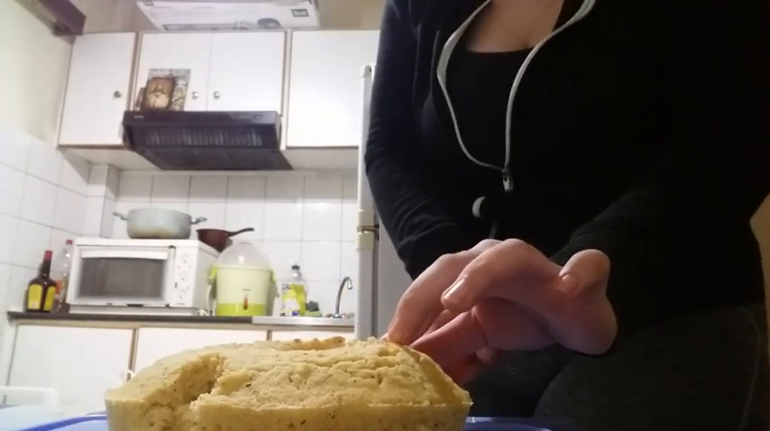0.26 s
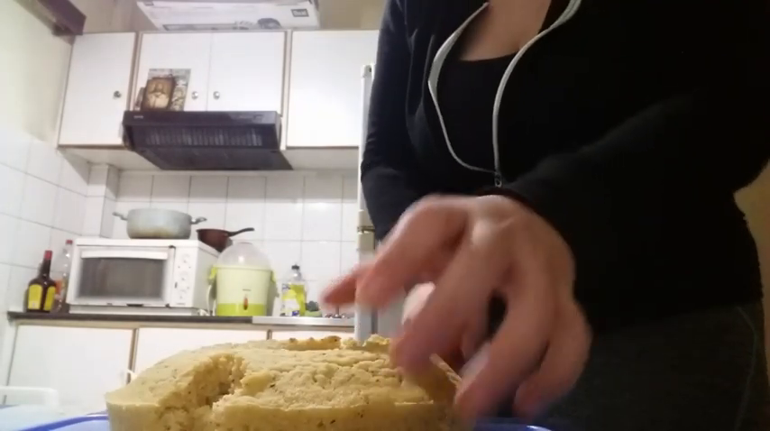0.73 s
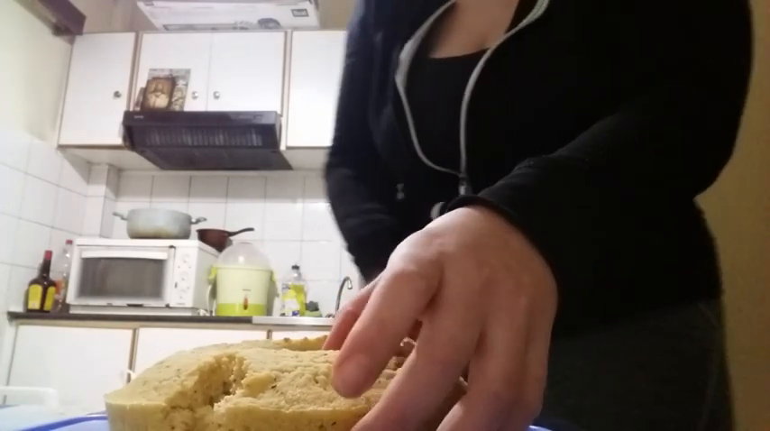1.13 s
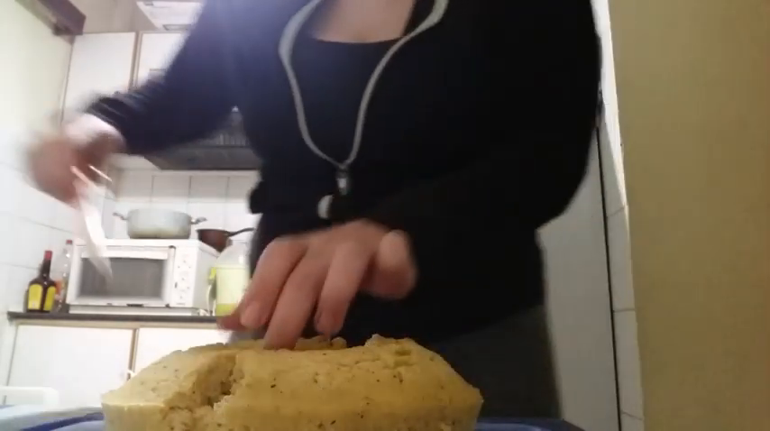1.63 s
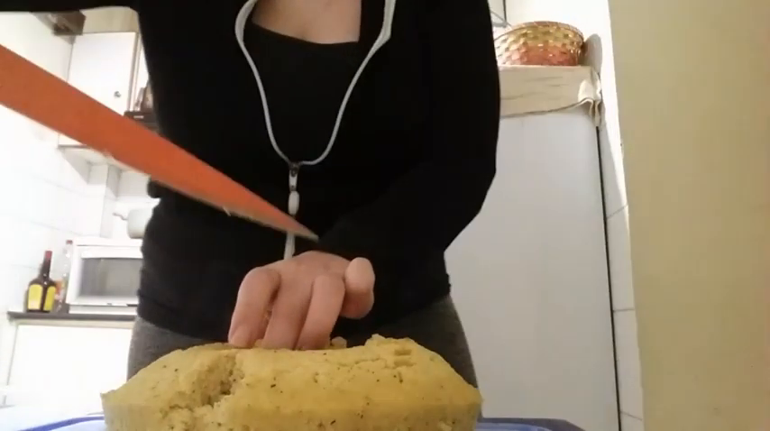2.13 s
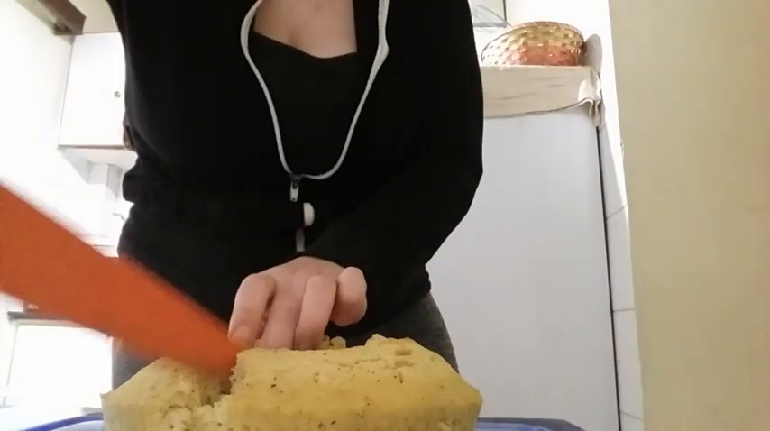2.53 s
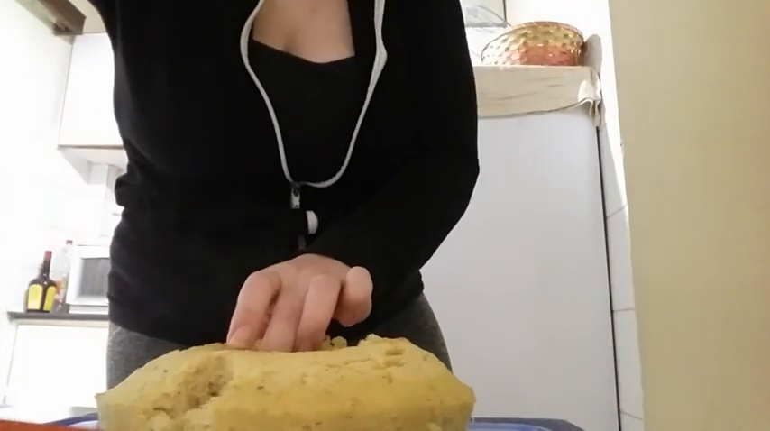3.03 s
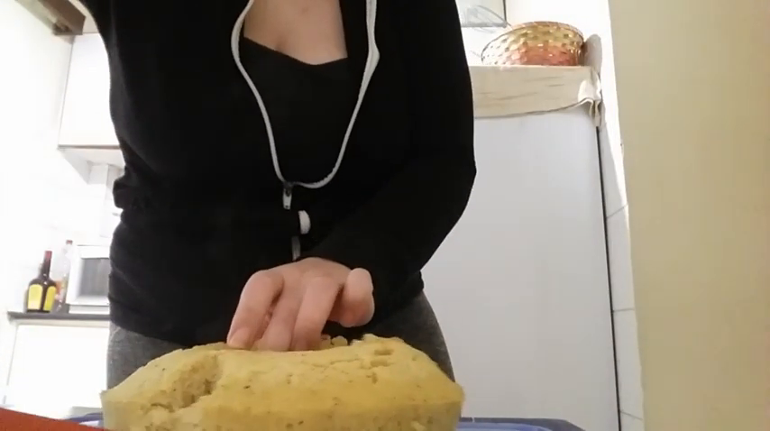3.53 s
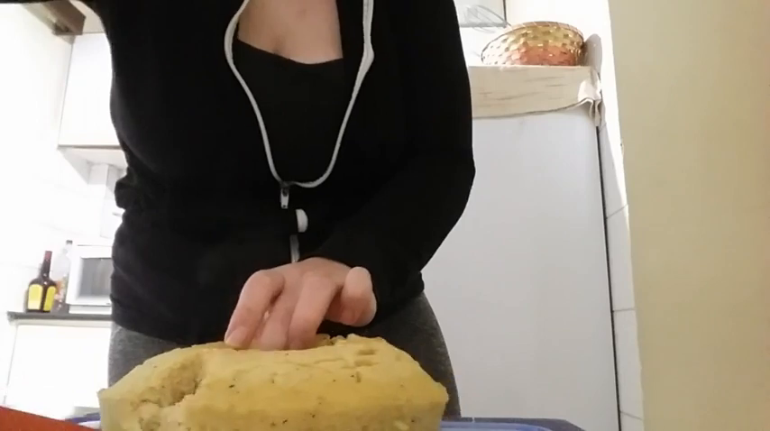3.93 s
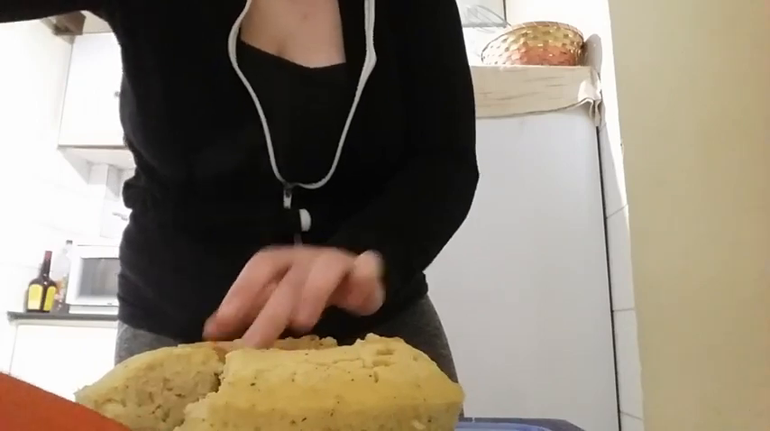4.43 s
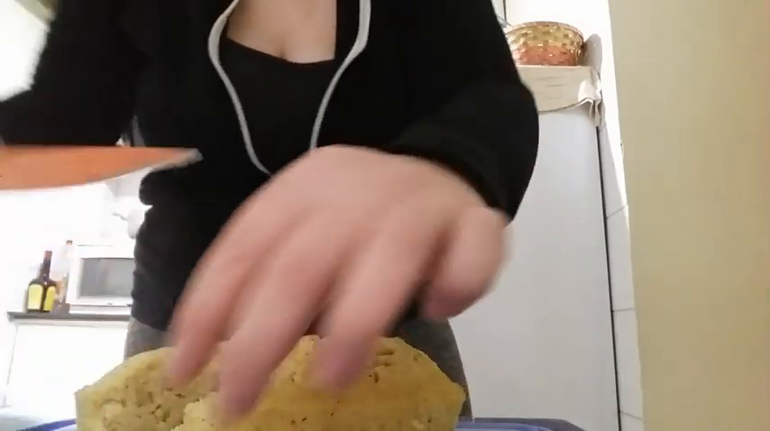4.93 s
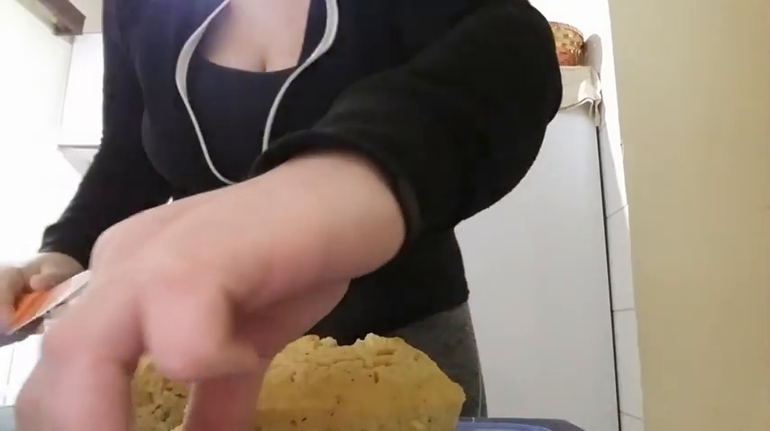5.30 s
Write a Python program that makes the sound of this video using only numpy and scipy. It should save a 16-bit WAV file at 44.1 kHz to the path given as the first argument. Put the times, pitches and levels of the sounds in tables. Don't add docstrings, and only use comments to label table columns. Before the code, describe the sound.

Hands jostle a crumbly loaf on a plastic tray with low knocks and crust snaps, then a knife saws quietly through it.

```python
import sys
import numpy as np
from scipy import signal
from scipy.fft import rfft, irfft, next_fast_len
from scipy.io import wavfile

SR = 44100
rng = np.random.default_rng(int(sys.argv[2]) if len(sys.argv) > 2 else 0)


def volts_from_decibels(level):
    exponent = np.asarray(level, float) / 20
    return 10 ** exponent


def to_wav(sig):
    pcm = np.clip(np.atleast_2d(sig), -1, 1) * 32767
    pcm = np.round(pcm).astype(np.int16)
    wavfile.write(sys.argv[1], SR, pcm.T)


N = 245195

# (f/Hz, level/dB per Hz)
HUM_AND_HISS = [(22, -23), (45, -25), (75, -25), (120, 8.5), (165, -12.5), (280, -14.5), (500, -17.5),
                (1000, -17), (2300, -22.5), (3300, -32.5), (4600, -32.5), (6000, -35), (9000, -37),
                (16000, -38)]
# (f/Hz, likeness from -1 to 1)
LIKENESS = [(60, 1), (180, 0.75), (550, -0.72), (1650, -0.0073), (4970, -0.2), (15000, -0.023)]
# (start t/s, end t/s, f/Hz, level/dB, pitch waver/rad)
PEEPS = [
    (1.589, 1.752, 5100, -69, 0.6),
    (1.82, 1.86, 5060, -67, .5),
    (2.16, 2.25, 6300, -73, 1.9),
]
# (f/Hz, level/dB, fade by 60 dB/s)
HOLLOW_MODES = [(790, -4, 0.023), (1000, 4, 0.037), (1600, -6, .02), (2140, -9, .02)]

# (f/Hz, level/dB, fade by 60 dB/s)
TRAY_MODES = [(69, -13, 0.014), (132.3, -21.5, 0.043), (162, -2.5, 0.026), (245.7, 4, 0.079),
              (250.5, 1.5, 0.13), (295.4, 1, 0.039), (351.4, -2, 0.041), (435.4, -2, 0.047),
              (609, -5.5, 0.022), (676, -5.5, 0.013)]
# (f/Hz, level/dB, fade by 60 dB/s)
THUD_MODES = [(175.5, -20.5, 0.14), (233, -4.5, 0.036), (246, -19, 0.22), (312.5, -9.5, 0.035),
              (442, -11, 0.043), (578, -16.5, 0.05)]
# (f/Hz, level/dB, fade by 60 dB/s)
CRUST_MODES = [(800, 6.5, 0.012), (995, 6.5, 0.029), (1520, 7, 0.013), (1720, 7, 0.0088), (2230, 8, 0.0052)]
# (f/Hz, level/dB, fade by 60 dB/s)
EDGE_MODES = [(2730, -3, 0.019), (3480, 6.5, 0.0025), (4260, 7, 0.01), (4270, 9, 0.002), (5000, -5, 0.013),
              (6070, -7, 0.0098), (8500, 5.5, 0.0041), (13800, -4, 0.0027)]
# (f/Hz, level/dB, fade by 60 dB/s)
BLADE_MODES = [(2767, 0.5, 0.029), (5100, 8, 0.0083), (5400, -26, 0.025), (6300, -34, 0.0081),
               (10400, 0, 0.0033), (14400, 4, 0.0044)]

# (start t/s, hold/s, level/dB)
LEANS = [(0.0, 0.022, -51), (0.139, .04, -52.5), (0.218, 0.046, -48.5), (0.4, 0.068, -45),
         (0.53, 0.056, -51), (0.618, 0.049, -51), (0.752, 0.059, -52), (0.96, 0.022, -51.5),
         (1.106, 0.065, -52.5), (1.256, 0.026, -59), (2.626, 0.098, -53.5), (2.85, 0.01, -53),
         (2.885, .08, -59), (3.143, 0.12, -49.5), (3.358, 0.029, -49), (3.498, 0.12, -53),
         (3.71, 0.046, -60), (3.8, 0.15, -58.5), (4.06, 0.12, -53.5), (4.244, 0.071, -60.5),
         (4.497, 0.045, -60), (4.906, 0.15, -66.5), (5.349, 0.024, -51.5), (5.506, 0.053, -57)]
# (t/s, lift/dB)
COUNTER_LIFT = [(0, -2.5), (0.7, -3.5), (1.3, 3.5), (2.6, 7.5), (2.95, 4), (3.15, 2.5), (3.6, -4),
                (4.3, -3.5), (4.6, 8), (5.3, -6), (5.56, 0)]
# (t/s, lift/dB)
HAND_PRESS = [(0.0, -8.5), (0.25, -3.5), (0.5, 2), (0.65, 4.5), (0.8, -0.5), (0.83, 8.5), (0.95, -6.5),
              (1.04, 16), (1.1, 10), (1.19, 12), (1.26, -6), (1.3, 3), (2.6, 3), (3.5, -4), (3.95, -0.5),
              (4.12, 9.5), (4.26, 4), (4.34, 15), (4.45, -9), (4.9, 1), (5.56, -7.5)]
# (t/s, samples by which the right port hears later)
SIDE_LAG = [(0, 6), (0.2, 0), (0.5, 3), (0.6, -7), (0.65, -6), (0.675, 4), (0.8, 1), (1.1, 10), (1.2, 10),
            (1.3, 1), (2.8, -4), (3.2, -2), (4.5, -1), (5.56, 0)]

# (start t/s, hold/s, drag level/dB, tearing above drag/dB, crackle above tearing/dB)
BRUSHES = [
    (1.32, 0.016, -66.5, -0.5, -0.5),
    (1.66, 0.12, -66.5, -4, -7.5),
    (1.85, 0.3, -70.5, -4.5, 4.5),
    (2.3, 0.036, -68, -15, 4),
    (3.0, 0.09, -70.5, -7, 2.5),
    (4.63, .02, -67.5, -7, -9),
    (4.88, 0.046, -78.5, 12, -25),
    (5.07, 0.027, -71, -12, -15),
    (5.26, 0.013, -66, -10, -13),
]
# (start t/s, hold/s, drag level/dB, tearing above drag/dB, crackle above tearing/dB)
SHIFTS = [(0.0, 0.045, -62.5, -4, -4), (0.09, 0.074, -71, -7, 1), (0.17, 0.0091, -55, -8, -5),
          (0.218, 0.035, -48, -7.5, -10), (0.34, 0.026, -46, -16.5, -5.5), (0.47, .02, -55.5, -9, -7),
          (0.515, 0.039, -39.5, -10.5, -9.5), (0.635, 0.046, -37.5, -9.5, 0), (0.67, 0.015, -32.5, -7, -8),
          (0.74, 0.042, -59.5, 4.5, -3.5), (0.8, 0.045, -45.5, -13.5, -8), (0.86, 0.12, -52.5, -12.5, 0),
          (1.0, 0.051, -47.5, -11.5, -2.5), (1.11, 0.016, -47.5, -8, -3.5), (1.15, 0.056, -40.5, -9, -3),
          (1.225, 0.058, -47.5, -9.5, 0), (5.0, 0.036, -63, -32, 5), (5.34, 0.016, -69, -3.5, -5),
          (5.43, 0.11, -68, 2, -6.5)]
# (start t/s, hold/s, drag level/dB, tearing above drag/dB, crackle above tearing/dB)
STROKES = [(2.61, 0.01, -61.5, -4.5, -3.5), (2.67, 0.018, -64.5, -3.5, 2), (2.84, 0.075, -66, 2.5, -2),
           (3.13, 0.1, -59.5, 5, -13), (3.26, 0.044, -54, -6.5, -2), (3.37, 0.039, -59.5, 1.5, -8.5),
           (3.49, 0.069, -58, 2, -5.5), (3.64, 0.039, -60.5, 2.5, -6.5), (3.74, 0.025, -65, 5, -6.5),
           (3.785, 0.058, -48.5, -4.5, -7), (3.9, 0.12, -48, -8.5, -4), (4.085, 0.12, -48, -8, -1.5),
           (4.205, 0.02, -49.5, -12, -5), (4.29, 0.081, -51, -15, -2), (4.38, 0.036, -56.5, -9, -1),
           (4.45, 0.064, -61.5, -15, 2), (4.53, 0.029, -46.5, -11, 0)]

# (t/s, peak level/dB, f/Hz, left over right/dB)
BUMPS = [(0.5096, -37, 385, 3), (0.527, -31, 328, 3), (0.5535, -34, 300, 0), (0.6424, -16, 310, 0),
         (0.6559, -22, 330, 1), (0.679, -21, 426, 1), (0.6985, -27.5, 396, 1), (0.7075, -30, 380, 1),
         (0.7115, -28, 450, 1), (0.813, -39, 240, -1), (0.825, -39, 450, 1), (0.905, -39, 310, 2),
         (0.946, -41, 250, 1), (1.022, -38, 453, 1), (1.048, -39, 460, 1), (1.153, -27, 465, 2),
         (1.185, -38, 450, 0), (1.222, -36, 310, 0), (1.26, -38, 230, 0), (2.628, -46, 110, 0),
         (2.848, -32.5, 135, 0), (3.2098, -38, 332, 0), (3.293, -43, 420, 3), (3.4842, -43, 344, 0),
         (3.729, -46, 260, -2), (4.085, -46, 400, 0), (4.329, -45, 480, 0)]
# (t/s, peak level/dB, f/Hz, left over right/dB)
CRUST_TICKS = [(0.0329, -50, 3900, 8.5), (0.2152, -31, 1840, 2), (0.4815, -52, 800, 5),
               (0.522, -48, 1300, 7), (0.5517, -47, 1500, -4), (0.6078, -39, 2800, 5),
               (0.612, -52, 4000, 2), (0.632, -23, 2600, 11), (0.6417, -18.5, 3000, 14),
               (0.6463, -25, 4000, -12), (0.654, -26.5, 2700, 7), (0.6593, -38, 4000, -2),
               (0.6744, -42, 2230, 0), (0.7741, -53, 2200, -1), (1.1105, -37, 2400, 11),
               (1.1476, -27, 2700, 18.5), (1.1528, -32, 1520, -12), (1.2981, -42, 950, 2),
               (2.8143, -43, 855, 1), (2.842, -27.5, 2400, -4), (2.8421, -36, 910, 1),
               (2.9446, -42.5, 1400, -2), (3.0925, -52, 3000, -1), (3.1183, -44, 2280, -3),
               (3.1569, -33.5, 1490, -7), (3.1825, -53, 1500, -2), (3.191, -42, 1400, -7),
               (3.2085, -44, 1700, -5), (3.2963, -40, 1750, -1), (3.3017, -28, 1690, 0),
               (3.3053, -32, 1500, -4), (3.3715, -42, 1900, -6), (3.4107, -47, 1650, -3),
               (3.5036, -34, 1900, -5), (3.6582, -50, 1700, 0), (3.7395, -56, 1900, -2),
               (4.0565, -44, 3170, -5), (4.139, -36, 2480, -9), (4.2188, -37, 2200, -4),
               (4.26, -51, 3500, -4), (4.5287, -46, 2600, -8), (5.3395, -51, 900, 8),
               (5.52, -46.5, 1530, 2.5)]
# (t/s, snap peak level/dB, thud level/dB, bright edge level/dB, left over right/dB)
HAND_KNOCKS = [(0.035, -54, -54, -52, 12), (0.215, -29.5, -14, -58.5, 4), (0.477, -72.5, -35.5, -92.5, 6),
               (0.51, -55, -50, -59, 17), (0.554, -49, -32, -72, 7), (0.607, -48, -37, -48, 3),
               (0.618, -59, -26, -65, -4), (0.631, -31.5, -27, -34, -15), (0.6407, -30, -6, -27, 7.5),
               (0.654, -43, -26, -36, 0), (0.674, -28, -12, -27.5, 3), (0.695, -60, -34, -55, -2),
               (0.706, -46, -47, -47, 6), (0.808, -62, -45, -64, -6), (0.87, -57, -32, -71, 5),
               (0.976, -70, -50, -54, -9), (1.11, -37.5, -34, -43.5, 12), (1.145, -35, -29.5, -36.5, -29),
               (1.152, -24, -25, -32, 0), (1.3, -50, -45, -69, -1), (4.999, -58, -47, -76, -1),
               (5.34, -54.5, -28, -74, 0), (5.398, -54, -52, -74, -3), (5.517, -49, -43, -76, 5)]
# (t/s, snap peak level/dB, thud level/dB, bright edge level/dB, left over right/dB)
KNIFE_KNOCKS = [(2.615, -56.5, -48.5, -65, -2.5), (2.67, -52.5, -54, -58, -3), (2.811, -50, -37, -55, 3),
                (2.8418, -36.5, -43, -43, 0), (2.943, -53, -44, -56, -1.0), (3.131, -54, -40.5, -54.5, -9),
                (3.154, -41, -63, -57, -0.5), (3.195, -47.5, -42, -73, -5), (3.208, -45, -28.5, -66, 3),
                (3.2937, -37.5, -35.5, -52.5, 4), (3.301, -40, -63, -50, -3), (3.371, -38, -31, -65, 2),
                (3.482, -76, -37, -74, 6), (3.504, -48, -49, -50.5, 0), (3.542, -48, -37.5, -66, -4),
                (3.737, -45.5, -53, -74, -5), (4.056, -57, -50, -60, -5.5), (4.109, -64, -36, -62, 3),
                (4.138, -55, -57, -53, -7), (4.22, -47, -45, -57, -9), (4.247, -71, -35, -83, 9),
                (4.331, -78, -51, -77, 4), (4.417, -79, -44, -74, -7), (4.511, -71, -45, -76, 4)]
# (t/s, peak level/dB, left over right/dB, lowest mode level/dB)
BLADE_TOUCHES = [
    (2.664, -52, -2, -1),
    (2.6748, -44.5, -9.5, -1),
    (2.6818, -58, 9, 14.5),
    (2.6914, -61, -3.0, -2),
    (2.8413, -28, -13.5, -10),
    (2.9144, -55, -5, -11),
    (4.5544, -81, 5, -6),
]


def rms_one(x):
    return x / np.sqrt(np.mean(x ** 2) + 1e-20)


def follow(table, t):
    return np.interp(t, *np.transpose(table))


def at_hz(table, hz):
    f, value = np.transpose(table)
    return np.interp(np.log(hz), np.log(f), value)


def drift(rate_hz):
    r = np.exp(-80 * np.pi * rate_hz / SR)
    noise = rng.standard_normal(N // 40 + 2002)
    slow = signal.lfilter([1], [1, -2 * r, r * r], noise)[2000:]
    return np.interp(np.arange(N) / 40, np.arange(len(slow)), rms_one(slow))


def highpass(x, order, hz):
    return signal.sosfilt(signal.butter(order, hz, "high", fs=SR, output="sos"), x)


def soften(x, hz, order=2):
    return signal.sosfilt(signal.butter(order, hz, fs=SR, output="sos"), x)


def ring(clicks, hz, t60):
    r, w = volts_from_decibels(-60 / (t60 * SR)), 2 * np.pi * hz / SR
    return signal.lfilter([0, np.sin(w)], [1, -2 * r * np.cos(w), r * r], clicks + 1e-18)


def place(at, sizes, pan_db, lag):
    out = np.zeros((2, N))
    right_at = at + np.round(lag).astype(int)
    np.add.at(out[0], np.clip(at, 0, N - 1), sizes * volts_from_decibels(pan_db / 2))
    np.add.at(out[1], np.clip(right_at, 0, N - 1), sizes * volts_from_decibels(-pan_db / 2))
    return out


def grains(per_s, spread_db, clump_db, scatter):
    chance = per_s * volts_from_decibels(clump_db * drift(25)) / SR
    at = np.flatnonzero(rng.random(N) < chance)
    count = len(at)
    size = volts_from_decibels(spread_db * np.minimum(rng.exponential(1, count), 4)) * rng.choice([-1, 1], count)
    return at, size, 3.0 * rng.standard_normal(count), scatter * rng.standard_normal(count)


def strike(s, level_db, pan_db, lag, modes, cracks, luck_db, sign=-1):
    later = rng.random((len(s), cracks)) * 0.0052
    later[:, 0] = 0
    fade_db = 970 * later + 3.7 * (later > 0)
    at = ((s[:, None] + later + 0.001017) * SR).astype(int)
    luck, out = rng.standard_normal((len(s), cracks, len(modes))), 0
    for k, (hz, db, t60) in enumerate(modes):
        size_db = level_db[:, None] + db + luck_db * luck[..., k] - fade_db
        size = volts_from_decibels(size_db) * sign ** k
        out = out + ring(place(at, size, pan_db[:, None], lag[:, None]), hz, t60)
    return out


def swells(start, hold, level_db, rise_db_per_s, fall_db_per_s, rest_db):
    t = np.arange(0, N + 64, 32) / SR
    power = volts_from_decibels(2 * rest_db)
    for s, h, db in zip(start, hold, level_db):
        before, after = np.clip(s - t, 0, 1), np.clip(t - s - h, 0, 1)
        power = power + volts_from_decibels(2 * (db - rise_db_per_s * before - fall_db_per_s * after))
    return np.interp(np.arange(N) / SR, t, 10 * np.log10(power))


def room_tone(patchy_db):
    out, edges = 0, 22 * 2 ** np.arange(0, 9.7, 0.4)
    white = rng.standard_normal((2, 2, N))
    for k, (low, high) in enumerate(zip(edges, edges[1:])):
        band = signal.butter(2, [low, high], "band", fs=SR, output="sos")
        mid, side = signal.sosfilt(band, white[k % 2])
        hz = np.sqrt(low * high)
        alike = np.clip(at_hz(LIKENESS, hz), -1, 1)
        gain = volts_from_decibels(at_hz(HUM_AND_HISS, hz) + patchy_db * drift(4.1) * (hz < 6000))
        out = out + gain * (np.sqrt(1 + alike) * mid + np.sqrt(1 - alike) * side * [[1], [-1]])
    return volts_from_decibels(-63.5) * rms_one(out)


def bird():
    t, out = np.arange(N) / SR, 0
    for start, end, hz, db, waver in PEEPS:
        gate = np.clip(np.minimum(t - start, end - t) / 0.0073, 0, 1)
        peep = np.sin(2 * np.pi * hz * t + waver * drift(60))
        out = out + volts_from_decibels(db + 2.1 * drift(22)) * gate * peep
    return out * np.array([[1], [-0.2]])


def kitchen(x):
    t60_s, wall_cut_hz, level_db = 0.11, 4300, -13.5
    size = next_fast_len(N + SR)
    w = 2 * np.pi * np.arange(size // 2 + 1) / size
    echoes = np.zeros((2, size // 2 + 1), complex)
    dull = 1 / (1 + 1j * w * SR / (2 * np.pi * wall_cut_hz))
    for k, lag in enumerate((rng.uniform(0.0055, 0.026, 16) * SR).astype(int)):
        loop = volts_from_decibels(-60 * lag / SR / t60_s) * dull * np.exp(-1j * w * lag)
        echoes[k % 2] += loop / (1 - loop) * (-1) ** (k // 2)
    return volts_from_decibels(level_db) * irfft(echoes * rfft(x.mean(axis=0), size), size)[:, :N]


def ports(x):
    peak_hz, width_hz, lift_db, dull_hz, leak_db = 4560, 650, 0.5, 5220, -27
    r, w = np.exp(-np.pi * width_hz / SR), 2 * np.pi * peak_hz / SR
    cavity = signal.lfilter(np.array([1, 0, -1]) * (1 - r * r) / 2, [1, -2 * r * np.cos(w), r * r], x)
    x = x + volts_from_decibels(lift_db) * cavity
    x = soften(x, dull_hz, order=6) + volts_from_decibels(leak_db) * x
    return highpass(x, 4, 62)


def palm():
    start, end, level_db = 4.81, 4.97, -63.5
    swell = np.sin(np.pi * np.clip((np.arange(N) / SR - start) / (end - start), 0, 1))
    rub = rng.standard_normal(N) * volts_from_decibels(1.9 * drift(30))
    hollow = sum(volts_from_decibels(db) * ring(rub, hz, t60) for hz, db, t60 in HOLLOW_MODES)
    return volts_from_decibels(level_db) * swell * rms_one(hollow)


def moves():
    bites = [1, 1.67, 1.67]
    power = volts_from_decibels(2 * np.array([[-74.5], [-76], [-82]]))
    for rows, rise, fall in [(BRUSHES, 95, 78), (SHIFTS, 405, 267.5), (STROKES, 362, 374)]:
        start, hold, force, tear, fine = np.transpose(rows)
        levels = [force, force + tear, force + tear + fine]
        curves = [swells(start, hold, db, rise * bite, fall, -120) for db, bite in zip(levels, bites)]
        power = power + volts_from_decibels(2 * np.array(curves))
    return 10 * np.log10(power)


def drag(level_db, modes, per_s, lift_db, split_hz):
    slips = soften(place(*grains(per_s, spread_db=4.0, clump_db=3.5, scatter=7.1)), hz=894)
    plain, mixed = 0, 0
    for k, (hz, db, t60) in enumerate(modes):
        tone = volts_from_decibels(db) * ring(slips, hz, t60) * (-1) ** k
        plain = plain + tone
        mixed = mixed + tone * volts_from_decibels(lift_db * (0.5 if hz > split_hz else -0.5))
    steady = np.sqrt(np.cosh(lift_db / 20 * np.log(10)))
    return volts_from_decibels(level_db) * mixed / np.std(plain) / steady


def lean():
    start, hold, level = np.transpose(LEANS)
    level_db = swells(start, hold, level, rise_db_per_s=304, fall_db_per_s=152, rest_db=-71)
    lift_db = follow(COUNTER_LIFT, np.arange(N) / SR)
    return drag(level_db, TRAY_MODES[:2], per_s=300, lift_db=lift_db, split_hz=100)


def ticks():
    t, out = np.arange(1500) / SR, np.zeros((2, N + 1600))
    for rows, cycles in [(CRUST_TICKS, 5.85), (BUMPS, 6.6)]:
        for s, db, hz, pan_db in rows:
            fade = volts_from_decibels(db + 0.5 - 60 * t * hz / cycles)
            splinter = volts_from_decibels(-11) * np.sin(2 * np.pi * 1.67 * hz * t)
            pulse = fade * (np.sin(2 * np.pi * hz * t) - splinter)
            left, right = int(s * SR), int(s * SR + follow(SIDE_LAG, s))
            out[0, left:left + len(t)] += pulse
            out[1, right:right + len(t)] += pulse * volts_from_decibels(-pan_db)
    return out[:, :N]


def knocks():
    s, snap_db, thud_db, edge_db, pan_db = np.transpose(HAND_KNOCKS + KNIFE_KNOCKS)
    lag = np.repeat([5.0, 3.0], [len(HAND_KNOCKS), len(KNIFE_KNOCKS)]) + 0.47 * pan_db
    side = follow(SIDE_LAG, s)
    lift_db = 0.69 * follow(HAND_PRESS, s)
    low = strike(s, thud_db + 0.5 - lift_db, 0.2 * pan_db, lag, THUD_MODES[:3], 1, luck_db=3.0, sign=0.79)
    high = strike(s, thud_db + 0.5 + lift_db, 0.2 * pan_db, lag, THUD_MODES[3:], 1, luck_db=4.0, sign=0.57)
    thud = soften(low + high, hz=820)
    snap = strike(s - 0.001, snap_db - 11.0, 0.61 * pan_db, side, CRUST_MODES, cracks=2, luck_db=2.0)
    edge = strike(s - 0.0002, edge_db - 5.5, 0.5 * pan_db, side, EDGE_MODES, cracks=3, luck_db=3.5)
    return highpass(thud + soften(snap, hz=3530), 3, 165) + edge


def crumbs(level_db, low_hz, high_hz, per_s, cycles, tilt_db):
    at, size, pan_db, lag = grains(per_s, spread_db=-2.0, clump_db=2.5, scatter=4.3)
    lag = lag + follow(SIDE_LAG, at / SR)
    dealt, out = rng.integers(0, 10, len(at)), 0
    for k, hz in enumerate(np.geomspace(low_hz, high_hz, 10)):
        mine = dealt == k
        clicks = place(at[mine], size[mine], pan_db[mine], lag[mine])
        out = out + volts_from_decibels(tilt_db * k / 9 + 2.0 * drift(4.9)) * ring(clicks, hz, cycles / hz)
    return volts_from_decibels(level_db) * rms_one(out)


def blade():
    s, level_db, pan_db, low_db = np.transpose(BLADE_TOUCHES)
    lag = follow(SIDE_LAG, s)
    sing = strike(s, level_db + low_db - 7.5, pan_db, lag, BLADE_MODES[:1], cracks=2, luck_db=-1.0)
    tick = strike(s, level_db - 9.0, pan_db, lag, BLADE_MODES[1:], cracks=2, luck_db=-3.5)
    return sing + tick


def scene():
    drag_db, tear_db, crackle_db = moves()
    press_db = follow(HAND_PRESS, np.arange(N) / SR)
    near = lean() + drag(drag_db, TRAY_MODES[2:], per_s=400, lift_db=press_db, split_hz=340)
    near += crumbs(tear_db, low_hz=636, high_hz=1900, per_s=2300, cycles=6.4, tilt_db=-7.5)
    near += crumbs(crackle_db, low_hz=2165, high_hz=4850, per_s=5000, cycles=18.2, tilt_db=0.0)
    near += crumbs(crackle_db, low_hz=5770, high_hz=12000, per_s=2900, cycles=7.1, tilt_db=17.0)
    near += ticks() + knocks() + blade()
    return ports(near + kitchen(near)) + room_tone(patchy_db=4.0) + bird() + palm()


def low_pass(x):
    return signal.sosfilt(signal.butter(12, 15750, fs=SR, output="sos"), x)


def record(dry):
    heard = highpass(dry, 2, 45) - 0.0006
    return low_pass(heard)


dry = scene()
out = record(dry)
to_wav(out)
```